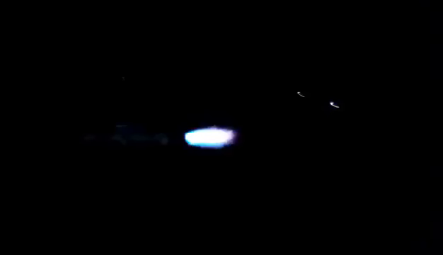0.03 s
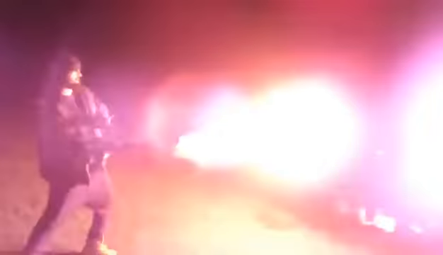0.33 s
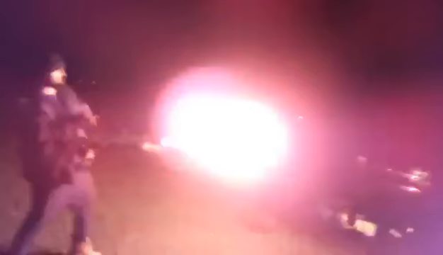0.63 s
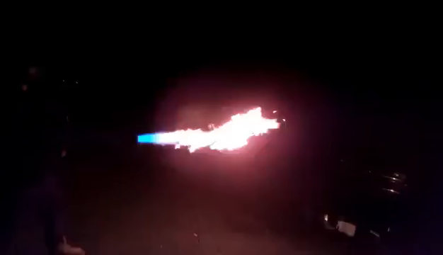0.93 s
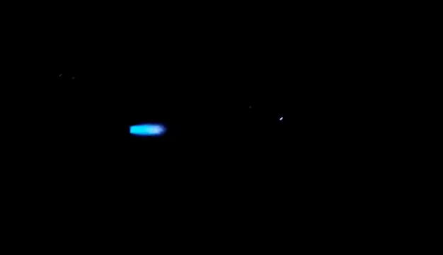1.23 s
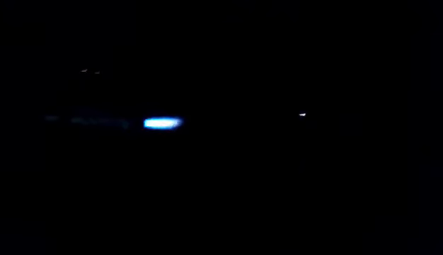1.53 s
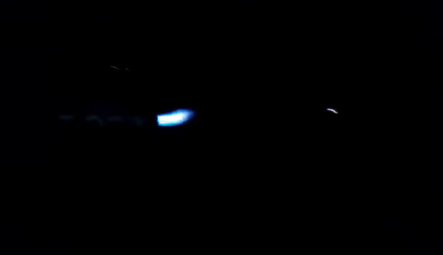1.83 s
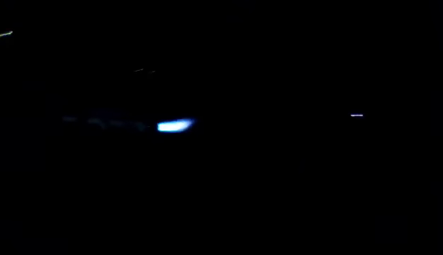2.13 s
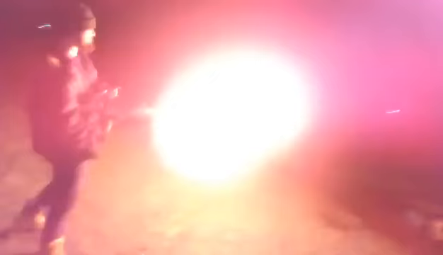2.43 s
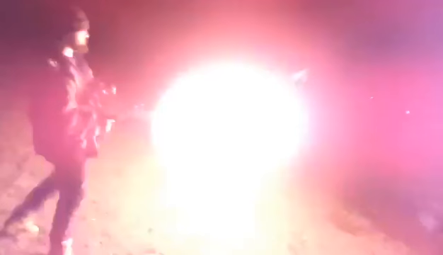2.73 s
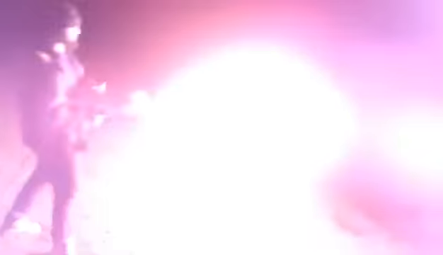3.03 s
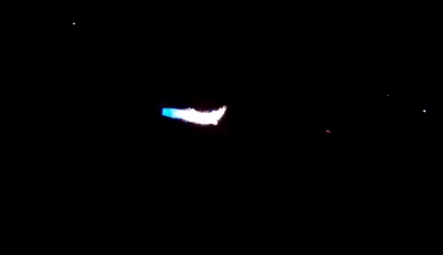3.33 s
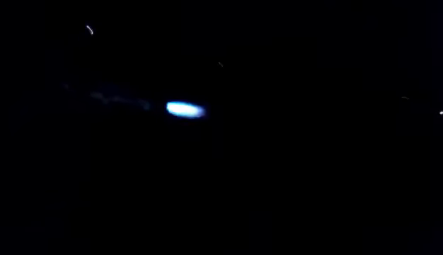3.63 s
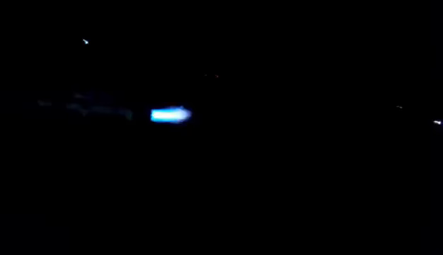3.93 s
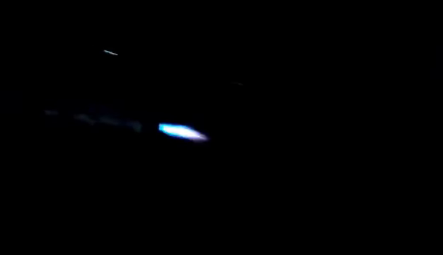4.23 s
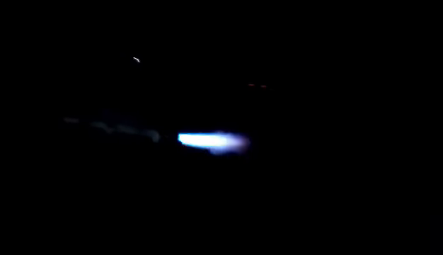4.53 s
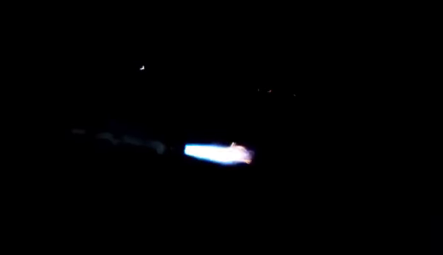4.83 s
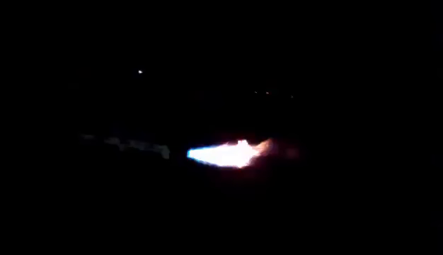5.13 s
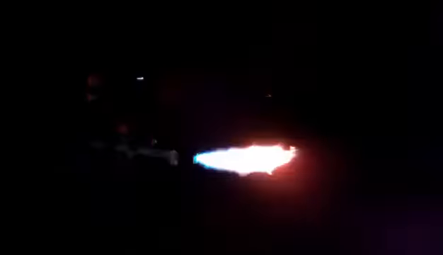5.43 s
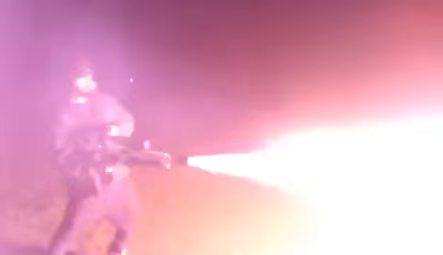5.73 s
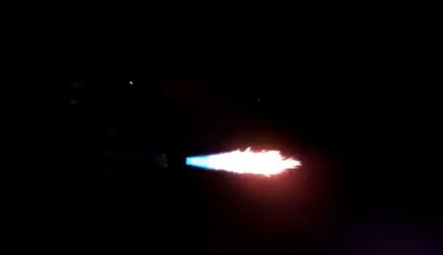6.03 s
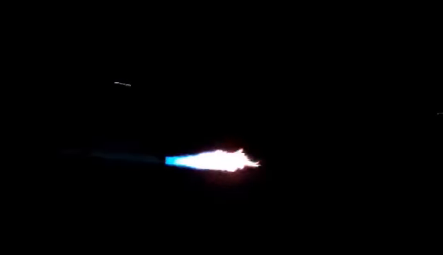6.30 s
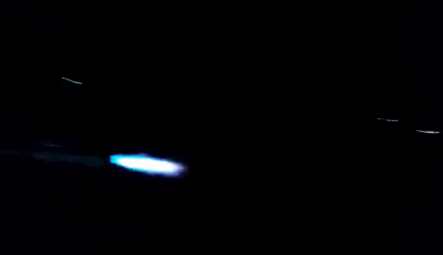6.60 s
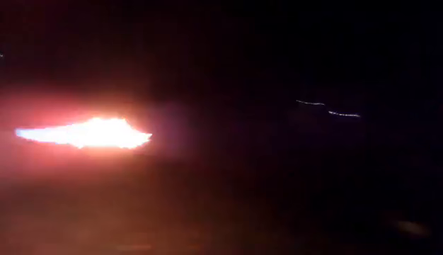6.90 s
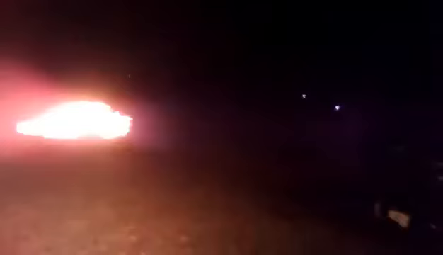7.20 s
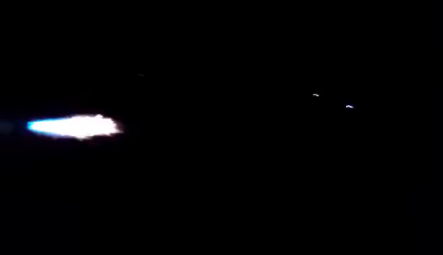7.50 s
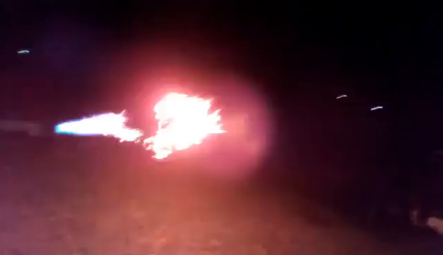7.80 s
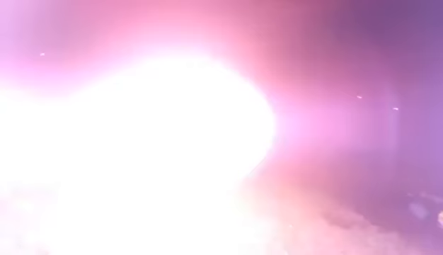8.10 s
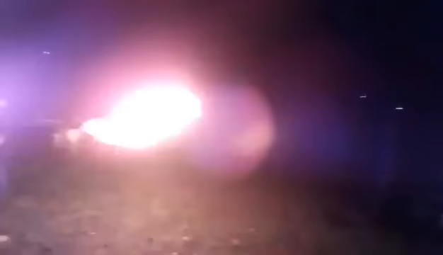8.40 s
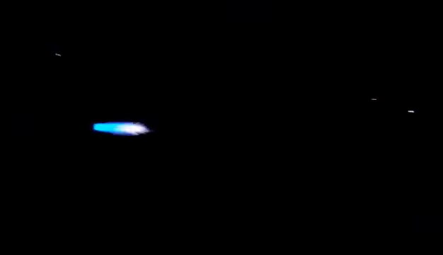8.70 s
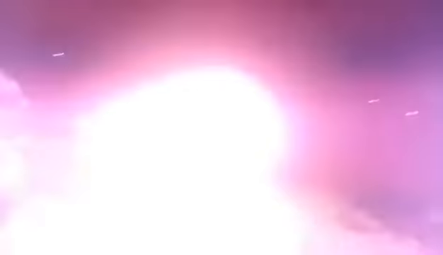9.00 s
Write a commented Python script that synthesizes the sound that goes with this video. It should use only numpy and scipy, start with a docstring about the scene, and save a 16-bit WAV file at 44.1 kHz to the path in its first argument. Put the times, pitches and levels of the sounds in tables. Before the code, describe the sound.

A gas torch roars and hisses in repeated bursts of flame outdoors, with sputtering pops and a low, wind-like rumble.

```python
"""Outdoors, over soft soil, a hand-held gas torch throws bursts of flame as its valve is worked.
Turbulent combustion makes the burner roar, turbulent mixing makes the jet rush, and resonance makes
the nozzle ring; all three follow the gas flow and the richness of the mixture. Unsteady heat release
makes the loose flame pop, sputter and rumble. Interference with the ground reflection colours the
sound, in a comb of notches that sweeps slowly as the torch is moved."""
import sys
import numpy as np
from scipy import signal
from scipy.fft import rfft, irfft, next_fast_len
from scipy.io import wavfile
from scipy.ndimage import uniform_filter1d

SR = 44100
rng = np.random.default_rng(int(sys.argv[2]) if len(sys.argv) > 2 else 0)


def generate_wav(sig):
    """Save sig (samples, or channels by samples) to the path in sys.argv[1] as 16-bit PCM at SR."""
    pcm = np.round(np.clip(np.atleast_2d(sig).T, -1, 1) * 32767).astype(np.int16)
    wavfile.write(sys.argv[1], SR, pcm)


N = 403515
TIME = np.arange(N) / SR

# gas flow between bursts, relative to the pilot flame: time_s, flow_db
IDLE_FLOW = [(0, -3), (.8, 2), (1, 0.5), (2.2, -1.5), (3.3, 1.5), (4.03, 0.5), (4.38, -6.5), (4.43, -10),
             (4.535, -19.5), (4.549, -40), (4.582, -37), (4.596, 4), (5.6, 10.5), (6.3, 3.5), (9.15, -5.5)]
# squeezes of the valve: start_s, length_s, extra_flow_db, attack_s, release_s
VALVE_BURSTS = [(0.029, 0.14, 15.5, .047, 0.023), (0.297, 0.076, 13.5, .047, 0.2),
                (2.25, 0.18, 13.5, 0.052, 0.048), (2.494, 0.13, 10.5, 0.052, 0.55),
                (4.594, 0.405, 6, 0.019, 0.0026), (5.735, 0.22, 3.5, 0.051, 0.019),
                (6.599, 0.33, 7.5, 0.1078, 0.32), (7.46, 0.32, 10, 0.0424, 0.45),
                (8.231, 0.14, 10, 0.041, 0.14), (8.497, 0.32, 9, 0.06, 0.0064),
                (9.063, 0.11, 5, 0.051, 0.033)]

def valve():
    """Throttling: each squeeze raises the gas flow that drives the torch's sounds; in dB."""
    flow_db, = in_time(IDLE_FLOW)
    for start_s, length_s, extra_db, attack_s, release_s in VALVE_BURSTS:
        flow_db += extra_db * envelope(start_s, length_s, attack_s, release_s)
    return flow_db

def drive_gain(drive_db, richness, pilot_db, exponent, rich_db):
    """Power law: amplitude grows as a power of drive from its lean pilot level; richness offsets it."""
    return from_db(pilot_db + exponent * drive_db + rich_db * richness)

# combustion noise: frequency_hz, density_db
ROAR_SPECTRUM = [(100, -6), (220, 4), (320, 2), (430, -3.5), (600, -2), (900, -1.5), (1250, -2.5),
                 (1420, -7), (1650, -14.5), (3000, -33)]
# mixture (0 lean and blue, 1 rich and yellow) and tube resonance: time_s, richness, tube_hz, tube_db
MIXTURE = [(0, 0.56, 1266, 0), (.45, 0.7, 1140, -19), (.79, 0.85, 1256, -6.5), (1.06, 0.16, 1212, -4.5),
           (2.17, 0.21, 1230, -7.5), (2.47, 0.91, 980, -3), (2.82, 0.81, 1015, -5), (2.95, 1, 1070, -19),
           (3.14, 0.61, 1167, -8), (3.5, 0.25, 1245, -11.5), (4.42, 0.028, 1214, -9), (4.7, 0.3, 1185, -6),
           (5.77, 0.5, 1178, -11), (6.66, 0.21, 1235, -9), (6.98, 0.76, 1075, -8), (7.8, 0.91, 1073, -7.5),
           (8.4, 0.74, 1099, -8), (9.15, 0.64, 1070, -9.5)]

def burner(drive_db, richness, lag_s=0.006):
    """Combustion noise: the roar lags the flow, and its tube resonance is clearest at low flow."""
    drive_db = np.interp(TIME - lag_s, TIME, drive_db)
    _, tube_hz, tube_db = in_time(MIXTURE)
    tube = from_db(tube_db - 0.25 * drive_db) * resonance(tube_hz, width_hz=165)
    gain = drive_gain(drive_db, richness, pilot_db=-30.5, exponent=0.87, rich_db=-11.5)
    return gain * (turbulence(ROAR_SPECTRUM) + tube)

# jet noise: frequency_hz, density_db
RUSH_SPECTRUM = [(700, -5), (1500, 2.5), (2100, 6.5), (3000, 1.5), (4100, 3.5), (5400, 2), (7000, -19),
                 (8300, -14), (14000, -32)]

def jet(drive_db, richness, split_hz=3460, laminar_db=-7):
    """Turbulent mixing: a harder, richer jet is brighter; at low flow it turns smooth and fades."""
    lower = unit_rms(butter(turbulence(RUSH_SPECTRUM), split_hz, "low", order=4))
    upper = unit_rms(butter(turbulence(RUSH_SPECTRUM), split_hz, "high", order=4))
    low_gain = drive_gain(drive_db, richness, pilot_db=-45, exponent=0.61, rich_db=-5.5)
    high_gain = drive_gain(drive_db, richness, pilot_db=-54.5, exponent=0.93, rich_db=10.1)
    rush = low_gain * lower + high_gain * upper + np.sqrt(low_gain * high_gain) * pipe()
    return rush * from_db(1.5 * np.minimum(drive_db - laminar_db, 0))

# resonance of the gas pipe: time_s, centre_hz, level_over_rush_db
PIPE_RESONANCE = [(0, 3770, -9), (.6, 3700, -6.5), (1.7, 4120, -4.5), (3.4, 3860, -11), (4.35, 3432, -12),
                  (5.5, 3422, -11), (6.9, 3964, -20), (8.3, 4280, -21), (8.85, 4900, -18),
                  (8.98, 5100, 5.5), (9.15, 5100, -16)]

def pipe(width_hz=260):
    """Pipe resonance: the note rises and falls as the torch turns, and ends in a brief squeal."""
    centre_hz, level_db = in_time(PIPE_RESONANCE)
    gain = from_db(level_db + 2 * drift(8.9))
    return gain * resonance(centre_hz + 0.5 * width_hz * drift(1.9), width_hz)

# notch in the rush: time_s, centre_hz, depth_fraction
RUSH_NOTCH = [(6.75, 2785, 0.06), (7.1, 2954, 0.8), (7.7, 3040, 0.9), (8.3, 3540, 0.66), (9.15, 4100, 0.7)]

def hollowed(rush):
    """Band rejection: a hollow opens in the rush as the torch swings round."""
    centre_hz, depth = in_time(RUSH_NOTCH)
    return rush - depth * moving_band(rush, centre_hz, width_hz=1300)

# the nozzle's ring and its overtone: frequency_hz, density_db
RING_SPECTRUM = [(4200, -13), (5400, 0), (5700, 6), (6650, 4.5), (6950, -1.5), (7500, -8.5), (8400, -35.5)]
OVERTONE_SPECTRUM = [(7500, -30), (9000, -1), (10200, 13.5), (11000, 8), (12000, 2.5), (14000, -6)]
# gains of those two bands: time_s, ring_db, overtone_db
NOZZLE_GAINS = [(0, -1.5, -3), (.53, -4.5, -6.5), (.78, -7, 7), (1.05, 2.5, 2.5), (2.4, 0, 2),
                (2.68, -3, -8.5), (3.16, -1, 3.5), (4.8, -1.7, -5.5), (6.3, -3, -6), (6.87, 3, 6),
                (7.27, -3, -3), (8.36, 2.5, 7), (9.15, 7, 3.5)]
# breathy whistles within the ring: centre_hz, width_hz, lean_level_db, added_when_rich_db
WHISTLES = [(5770, 450, -8.5, 7.5), (6420, 234, -4, -8)]

def nozzle(drive_db, richness, wander_hz=70):
    """Nozzle resonance: a ring and its overtone; a hard jet lowers the ring and drowns its whistles."""
    ring_db, overtone_db = in_time(NOZZLE_GAINS)
    excess_db = np.maximum(drive_db, 0)
    band = shifted(turbulence(RING_SPECTRUM), by_hz=265.2 - 297 * richness - 11 * excess_db)
    whistles = np.zeros(N)
    for centre_hz, width_hz, lean_db, rich_db in WHISTLES:
        gain = from_db(lean_db + rich_db * richness - 0.14 * excess_db + 3 * drift(1.56))
        whistles += gain * resonance(centre_hz + wander_hz * drift(1.5), width_hz)
    sizzle = from_db(-3) * resonance(11080 + wander_hz * drift(4.8), width_hz=1000)
    ring_gain = drive_gain(drive_db, richness, pilot_db=-43.5, exponent=1.193, rich_db=0.55)
    overtone_gain = drive_gain(drive_db, richness, pilot_db=-60.5, exponent=0.82, rich_db=0.3)
    ring = from_db(ring_db) * (band + whistles)
    overtone = from_db(overtone_db + 1.5 * drift(11)) * (turbulence(OVERTONE_SPECTRUM) + sizzle)
    return ring_gain * ring + overtone_gain * overtone

def nozzle_notch(gas, centre_hz=5450, depth=0.43):
    """Absorption: the nozzle swallows a narrow band just under its ring."""
    return gas - depth * moving_band(gas, np.full(N, centre_hz), width_hz=650)

# chokes in the gas line: centre_s, length_s, gain_db
CHOKES = [(5.674, 0.032, -12.5)]

def choking(edge_s=0.0032):
    """Flow restriction: the gain of the gas sounds drops while the line is choked."""
    gain_db = sum(db * (abs(TIME - centre_s) < length_s / 2) for centre_s, length_s, db in CHOKES)
    return from_db(uniform_filter1d(gain_db, int(edge_s * SR)))

# spurts of fuel: centre_s, length_s, level_db, centre_hz
SPITS = [(2.462, 0.42, -54, 12200), (2.912, 0.08, -35, 3140), (2.916, 0.12, -52, 12200),
         (5.708, 0.035, -35, 3620), (8.464, 0.13, -51, 12200), (8.94, 0.24, -48.5, 3135)]

def spits():
    """Transient jet noise: fuel spurts through the nozzle in short rasps."""
    out = np.zeros(N)
    for centre_s, length_s, level_db, centre_hz in SPITS:
        swell = np.exp(-(2 * (TIME - centre_s) / length_s) ** 4)
        out += from_db(level_db) * swell * resonance(np.full(N, centre_hz), width_hz=1700)
    return out

# flares of the loose flame: start_s, length_s, extra_rumble_db, duck_db
FLARES = [(0.186, 0.12, 8, -2), (1.722, 0.14, 2, 9), (2.94, 0.1023, 3, 2), (5.023, 0.025, 17, 1),
          (5.347, 0.096, -1.5, 7.5), (7.21, 0.098, 1.5, 4), (7.605, 0.091, 0, 10.5),
          (8.007, 0.12, -0.5, 10)]

def flares(drive_db, rumble_db):
    """Amplitude modulation: the hiss and roar duck briefly while the flame rumbles and pops."""
    flaring = np.zeros(N)
    for start_s, length_s, extra_db, duck_db in FLARES:
        flare = envelope(start_s, length_s, attack_s=0.0476, release_s=0.02115)
        drive_db = drive_db - duck_db * flare
        rumble_db = rumble_db + extra_db * flare
        flaring += flare
    return drive_db, rumble_db, flaring

# the loudest pops of the flame: time_s, level_db, pitch_hz
LOUD_POPS = [(.236, -17, 260), (.505, -11, 200), (1.761, -15, 253), (1.787, -17, 690), (1.8, -12.5, 337),
             (2.794, -15, 231), (3.061, -16.5, 332), (3.718, -15, 269), (4.436, -13, 243),
             (4.502, -18, 249), (4.554, -17, 200), (5.046, -14, 257), (5.402, -12, 250),
             (7.246, -16.5, 296), (7.266, -21, 680), (7.314, -15, 333), (7.649, -13.5, 259),
             (7.657, -21, 375), (7.664, -13, 400), (7.846, -15.5, 990), (8.061, -24, 520),
             (8.065, -11, 261), (8.084, -17, 790), (8.418, -18, 250)]

def stuttering_pops(repeats=2, spacing_s=0.00348, fall_db=9):
    """Intermittent burning: each loud pop breaks into an uneven, fading run; gives rows of pops."""
    rows = list(LOUD_POPS)
    for time_s, level_db, pitch_hz in LOUD_POPS:
        for k, (late, detune) in enumerate(rng.uniform(0.566, 1.58, (repeats, 2))):
            rows.append((time_s + spacing_s * (k + late), level_db - fall_db * (k + 1), pitch_hz * detune))
    return rows

def sputter(per_s, level_db, centre_hz, spread):
    """Poisson process: small pops come at random, with log-normal pitches; gives rows of pops."""
    onsets = np.flatnonzero(rng.random(N) < per_s / SR)
    scatter = rng.standard_normal(N)
    return [(i / SR, level_db[i], centre_hz * np.exp(spread * scatter[i])) for i in onsets]

def pops(rows, gain_db=-0.5, decay_cycles=0.22):
    """Sudden expansion: as a pocket of gas burns, the pressure swells, snaps over and sucks back."""
    out = np.zeros(N + SR)
    pulse_s = np.arange(-SR // 50, SR // 50) / SR
    for time_s, level_db, pitch_hz in rows:
        cycles = pitch_hz * pulse_s
        puff = -np.sin(2 * np.pi * cycles) / np.cosh(np.clip(cycles / decay_cycles, -50, 50))
        start = max(0, int(time_s * SR) - len(puff) // 2)
        out[start:start + len(puff)] += from_db(level_db + gain_db) * puff / np.max(abs(puff))
    return out[:N]

# loose pockets of gas catching: centre_s, length_s, level_db, cutoff_hz
WHOOMPS = [(0.256, 0.075, -23.5, 635), (1.811, 0.085, -27, 810), (6.279, 0.16, -30, 558),
           (8.051, 0.045, -25, 850)]

def whoomps(low_hz=112):
    """Deflagration: a loose pocket of gas catches in a short swell of dull turbulence."""
    out = np.zeros(N)
    for centre_s, length_s, level_db, cutoff_hz in WHOOMPS:
        near = abs(TIME - centre_s) < length_s
        swell = np.exp(-2 * ((TIME[near] - centre_s) / (length_s / 2)) ** 2)
        gust = butter(rng.standard_normal(SR // 2), [low_hz, cutoff_hz], "band", order=3)[-len(swell):]
        out[near] += from_db(level_db) * swell * unit_rms(gust)
    return out

# rumble of the loose flame between flares: time_s, relative_level_db
RUMBLE_LEVEL = [(0, -31), (2.3, -30.5), (2.8, -30), (3.35, -37.5), (3.7, -32), (4.2, -35), (4.5, -33),
                (4.9, -35.5), (5.2, -27), (6.7, -29), (7.6, -28), (9.15, -28.5)]
# its spectrum: frequency_hz, density_db
RUMBLE_SPECTRUM = [(20, -37), (35, -29), (55, -5.5), (85, 3.5), (130, 0.5), (200, -2), (320, -1.5),
                   (450, -16.5), (800, -18.5), (2000, -49)]

def loose_flame(rumble_db, gain_db=2, billow_db=2):
    """Unsteady heat release: the loose flame rumbles as it billows."""
    return from_db(rumble_db + gain_db + billow_db * drift(21)) * turbulence(RUMBLE_SPECTRUM)

# delay of the ground reflection: time_s, lag_ms
GROUND_DELAY = [(0, 3.38), (.7, 3.32), (1.9, 3.4), (2.5, 3.18), (2.9, 3.18), (3.2, 3.04), (3.45, 3.05),
                (3.75, 3.26), (4.05, 3.53), (4.45, 3.55), (5, 3.48), (5.5, 3.58), (5.85, 3.44),
                (6.25, 3.34), (6.62, 3.19), (7.3, 3.12), (8.3, 3.03), (9.15, 2.92)]
# its strength for the gas sounds: time_s, reflected_fraction
GROUND_STRENGTH = [(2.6, .68), (3.4, .84), (5, .68), (7.5, .7), (9, .84)]

def with_ground(direct, strength, dull_hz, turn_rad=0.15):
    """Comb filtering: a delayed reflection, dulled and turned in phase by soil, joins the sound."""
    lag_ms, = in_time(GROUND_DELAY)
    dulled = butter(direct, dull_hz, "low", order=1)
    dulled = butter(dulled[::-1], dull_hz, "low", order=1)[::-1]  # backwards, to cancel the filter's lag
    reflected = np.real(analytic(dulled) * np.exp(1j * turn_rad))
    return direct + strength * np.interp(TIME - lag_ms / 1000, TIME, reflected)

def turbulence(spectrum):
    """Spectral shaping: noise takes the given spectrum and falls away past its ends; rms 1."""
    size = next_fast_len(N)
    hz = np.maximum(np.arange(size // 2 + 1) * SR / size, 1)
    points_hz, density_db = np.transpose(spectrum)
    skirts = np.minimum(1, np.minimum(hz / points_hz[0], points_hz[-1] / hz)) ** 2
    gain = skirts * from_db(np.interp(np.log(hz), np.log(points_hz), density_db))
    return unit_rms(irfft(rfft(rng.standard_normal(size)) * gain, size)[:N])

def resonance(centre_hz, width_hz):
    """Random excitation: noise rings in a moving resonance; rms 1."""
    return unit_rms(moving_band(rng.standard_normal(N), centre_hz, width_hz, order=3))

def moving_band(x, centre_hz, width_hz, order=1):
    """Heterodyne filtering: the part of x in a band whose centre moves."""
    carrier = np.exp(2j * np.pi * np.cumsum(centre_hz) / SR)
    return 2 * np.real(butter(x / carrier, width_hz / 2, "low", order=order) * carrier)

def shifted(x, by_hz):
    """Single-sideband modulation: slides a band up or down in frequency."""
    return np.real(analytic(x) * np.exp(2j * np.pi * np.cumsum(by_hz) / SR))

def analytic(x):
    """Hilbert transform: x as a complex signal whose phase can be turned."""
    return signal.hilbert(x, next_fast_len(N))[:N]

def drift(per_s):
    """Low-passed noise: a random wander at about this many changes a second; spread 1."""
    hop, settle = 40, 2000
    pole = np.exp(-2 * np.pi * per_s * hop / SR)
    noise = rng.standard_normal(N // hop + settle + 2)
    slow = signal.lfilter([1], [1, -2 * pole, pole * pole], noise)[settle:]
    return np.interp(np.arange(N) / hop, np.arange(len(slow)), unit_rms(slow))

def envelope(start_s, length_s, attack_s, release_s):
    """Linear rise towards 1, then exponential decay once the length has passed."""
    rise = np.clip((TIME - start_s) / attack_s, 0, 1)
    return rise * np.exp(-np.clip((TIME - start_s - length_s) / max(release_s, 0.003), 0, 30))

def in_time(rows):
    """Linear interpolation: each column of a curve at every sample."""
    time_s, *columns = np.transpose(rows)
    return [np.interp(TIME, time_s, column) for column in columns]

def butter(x, hz, kind, order):
    """Maximally flat filter."""
    return signal.sosfilt(signal.butter(order, hz, kind, fs=SR, output="sos"), x)

def from_db(db):
    """Decibels to amplitude ratio."""
    return 10 ** (np.asarray(db) / 20)

def unit_rms(x):
    """Normalisation to rms 1."""
    return x / np.sqrt(np.mean(x ** 2) + 1e-20)

def scene():
    """Superposition: torch and pops, each with its ground reflection, add to whoomps and rumble."""
    drive_db, rumble_db, flaring = flares(valve(), in_time(RUMBLE_LEVEL)[0])
    richness = in_time(MIXTURE)[0]
    roar = burner(drive_db, richness)
    rush = hollowed(jet(drive_db, richness))
    ring = nozzle(drive_db, richness)
    # the unsteady flow shakes all three together, and each flickers a little on its own
    flutter = from_db(0.76 * drift(25) + 0.61 * drift(107))
    gas = flutter * sum(part * from_db(drift(24)) for part in (roar, rush, ring))
    direct = nozzle_notch(gas) * choking() + spits()
    torch = with_ground(direct, strength=in_time(GROUND_STRENGTH)[0], dull_hz=5360)
    # the flame always sputters a little, and much faster and crisper in a flare
    calm = sputter(per_s=18, level_db=rumble_db + 7.5, centre_hz=258, spread=0.57)
    flared = sputter(per_s=130 * flaring, level_db=rumble_db - 13, centre_hz=465, spread=0.17)
    popping = with_ground(pops(stuttering_pops() + calm + flared), strength=0.051, dull_hz=1500)
    return (torch + popping + whoomps() + loose_flame(rumble_db))[None]

def record(dry, ceiling=0.42, fade_s=0.005, cutoff_hz=13750):
    """Soft saturation rounds the peaks; the ends fade and a steep low-pass cuts the top."""
    rounded = dry / (1 + (dry / ceiling) ** 4) ** 0.25
    fade = np.minimum(1, np.minimum(TIME, TIME[-1] - TIME) / fade_s)
    return signal.sosfilt(signal.ellip(12, 0.1, 80, cutoff_hz, fs=SR, output="sos"), rounded * fade)

dry = scene()
out = record(dry)
generate_wav(out)
```